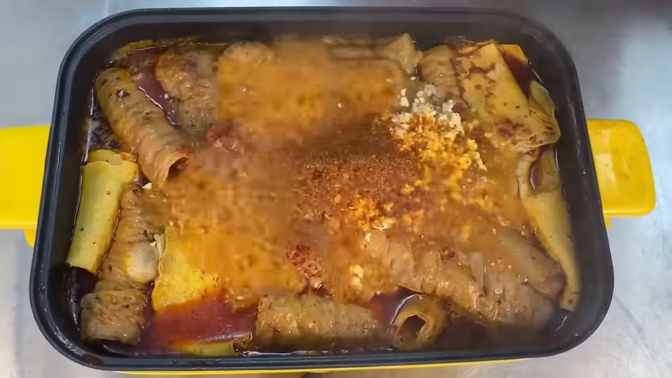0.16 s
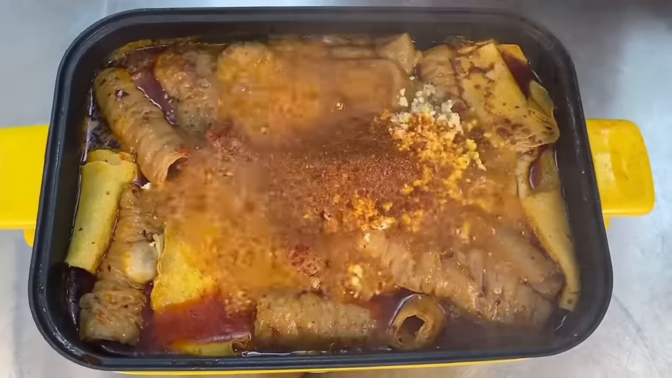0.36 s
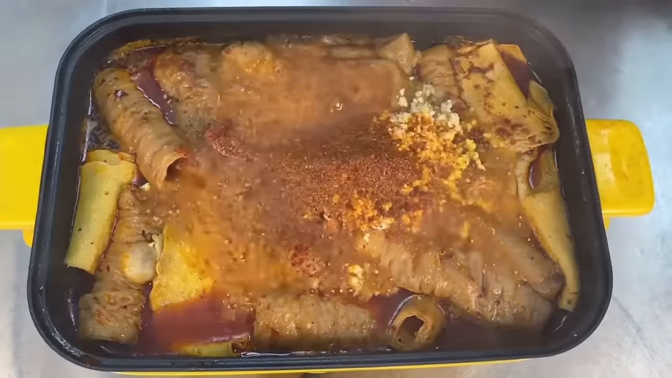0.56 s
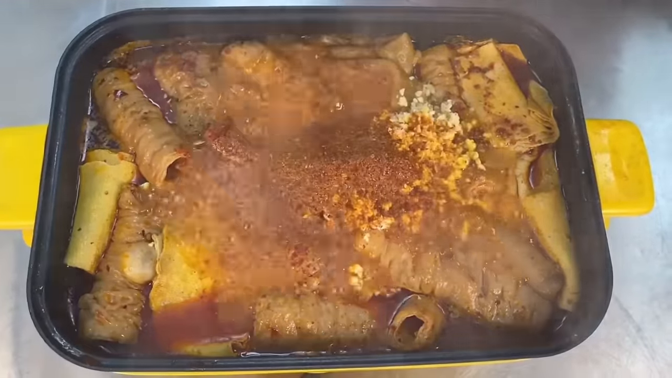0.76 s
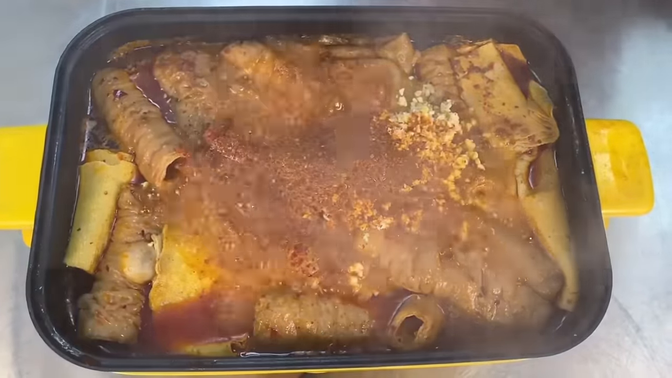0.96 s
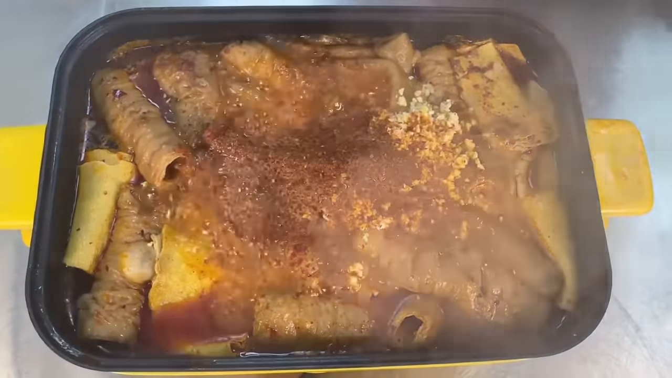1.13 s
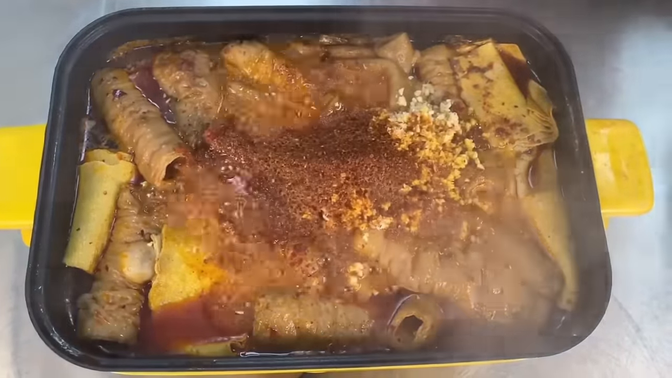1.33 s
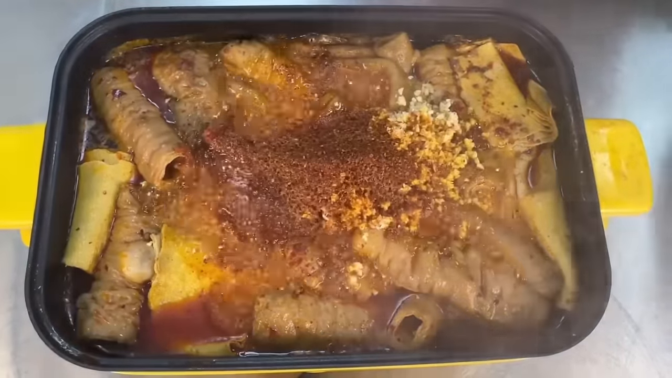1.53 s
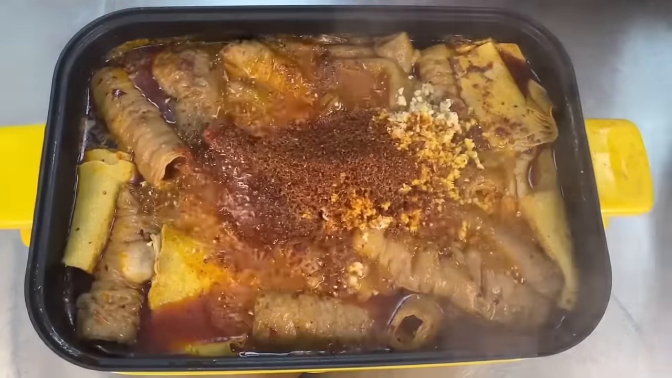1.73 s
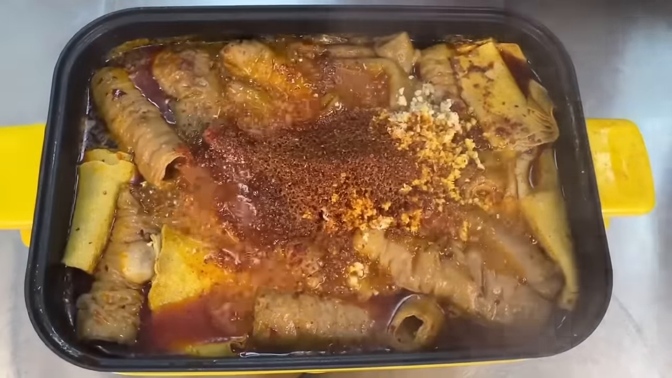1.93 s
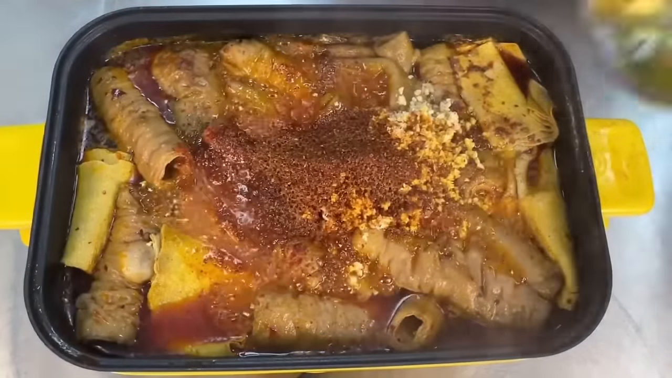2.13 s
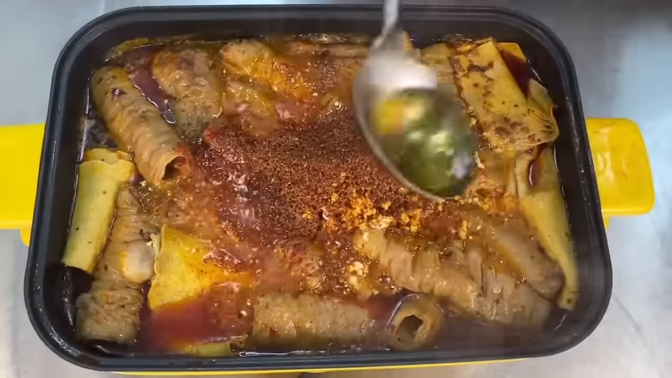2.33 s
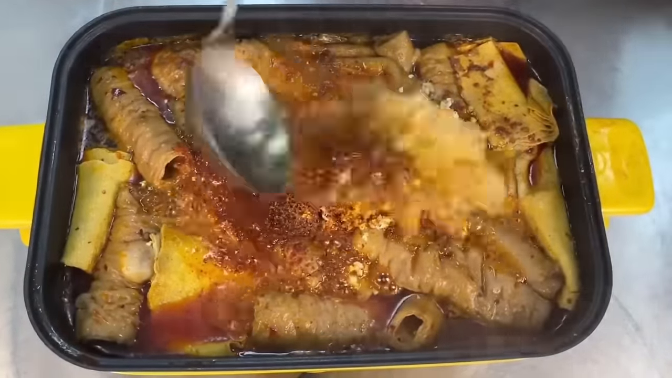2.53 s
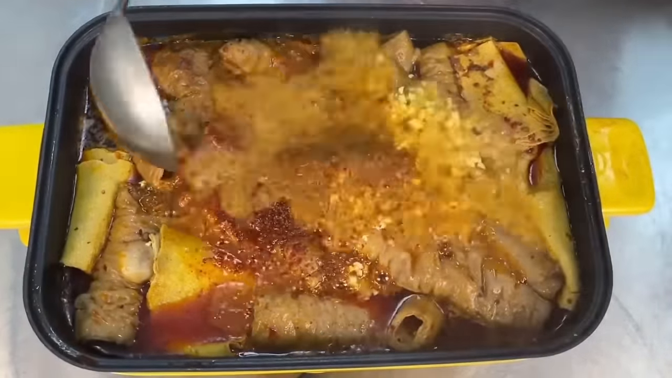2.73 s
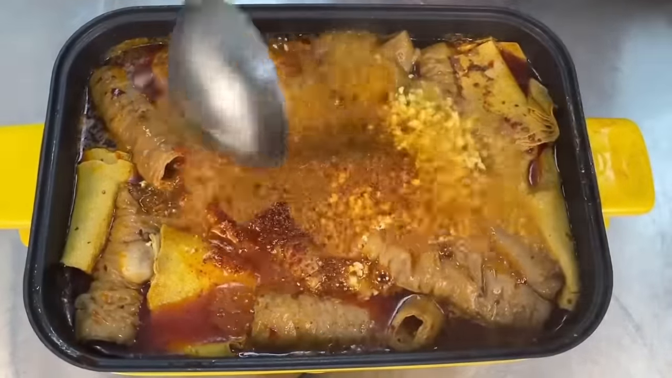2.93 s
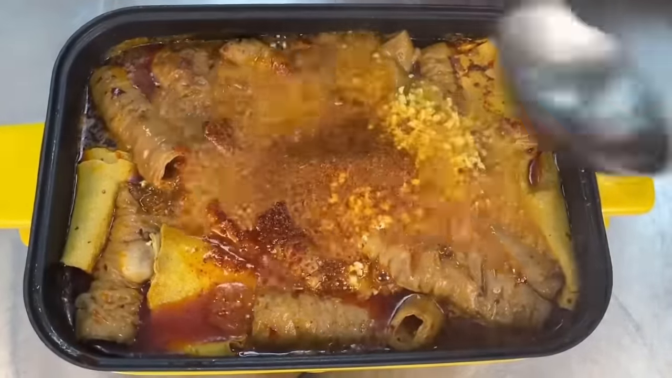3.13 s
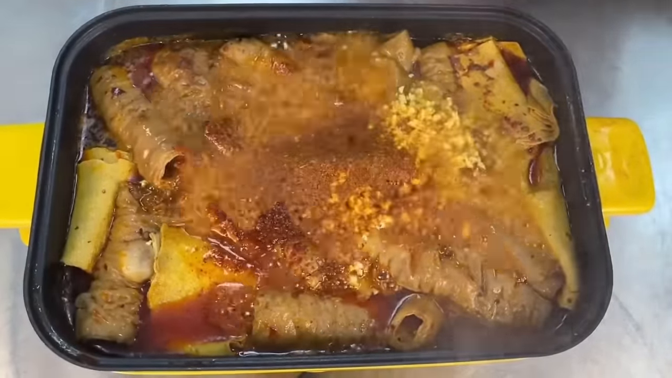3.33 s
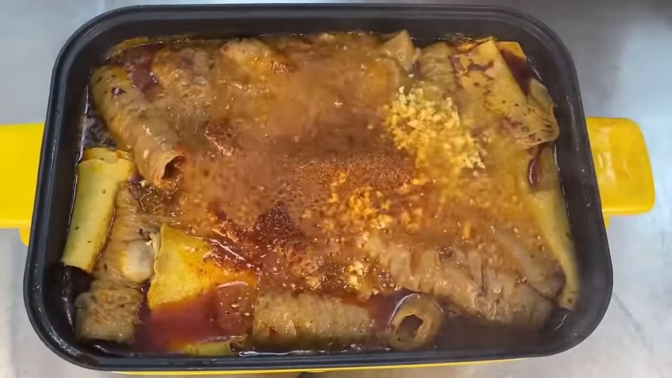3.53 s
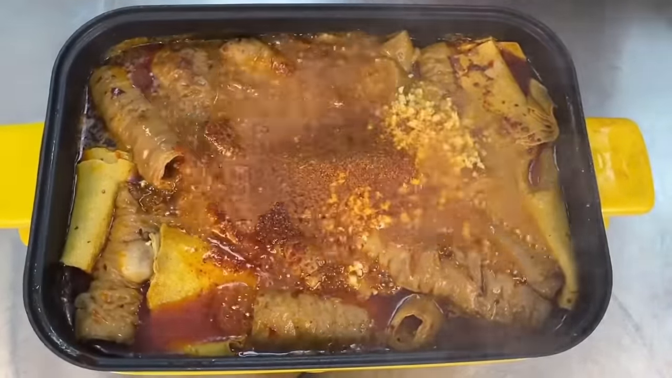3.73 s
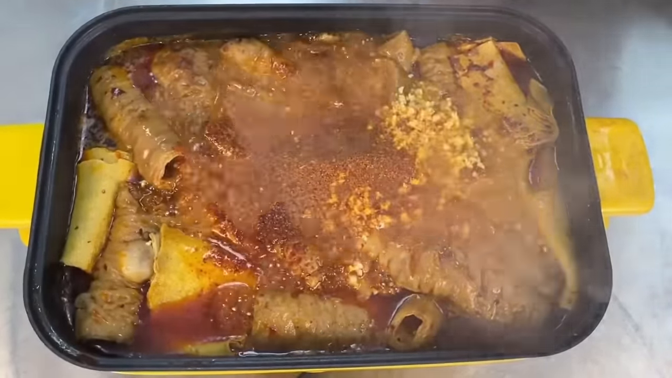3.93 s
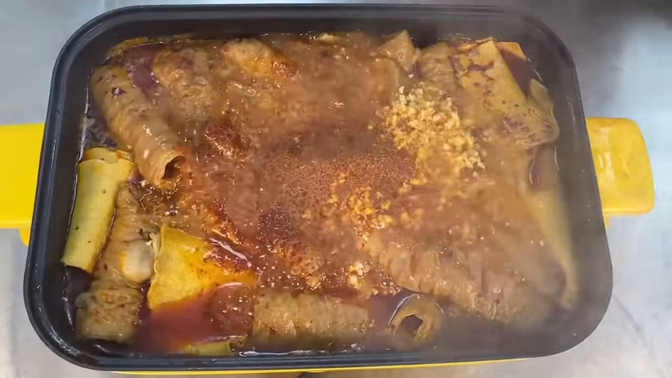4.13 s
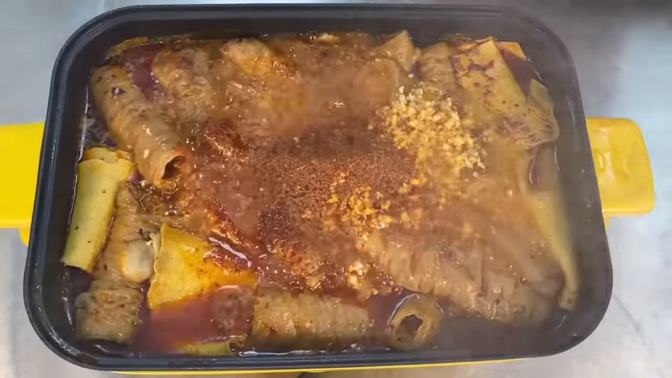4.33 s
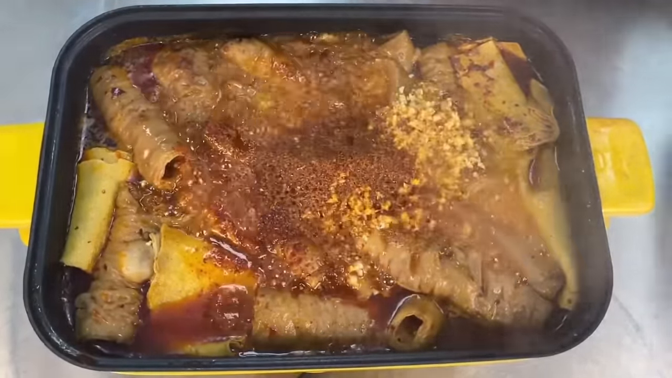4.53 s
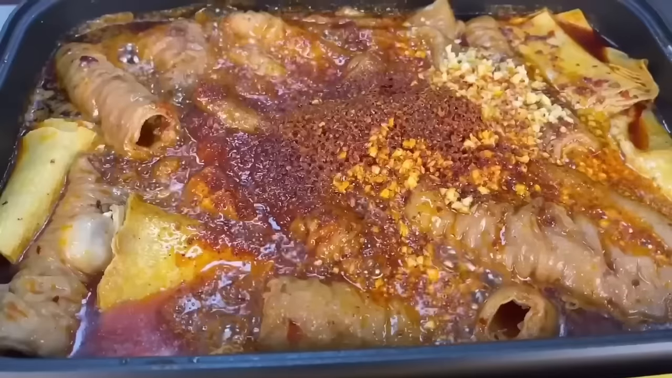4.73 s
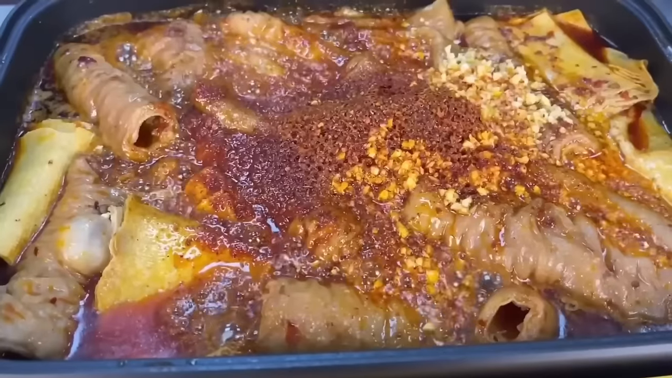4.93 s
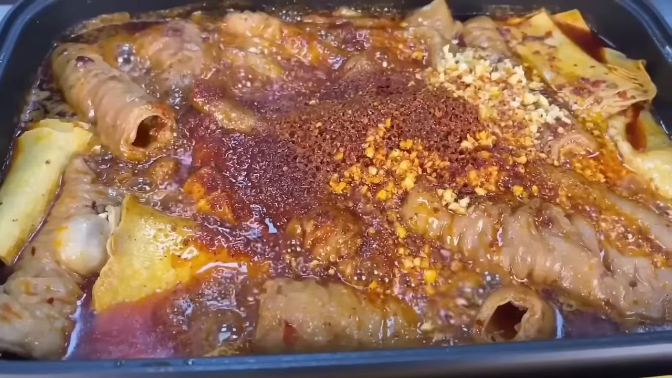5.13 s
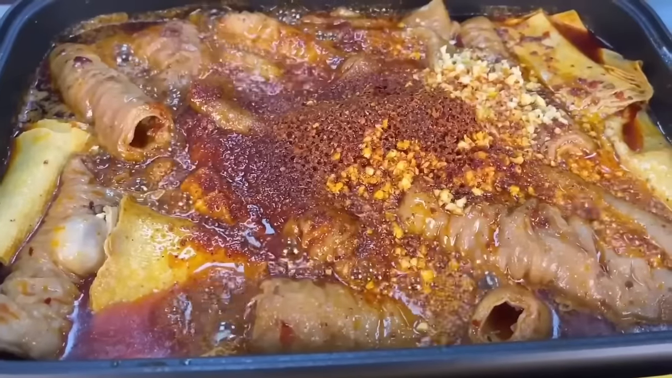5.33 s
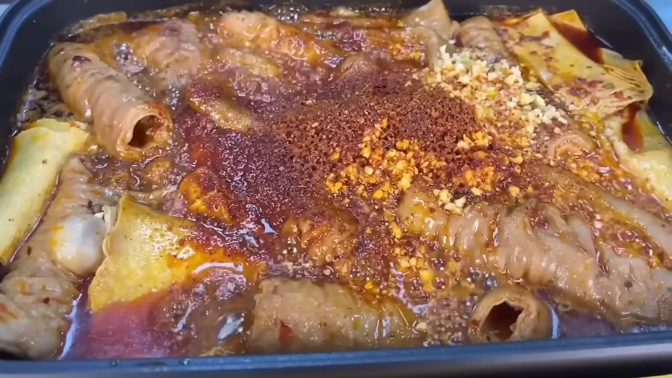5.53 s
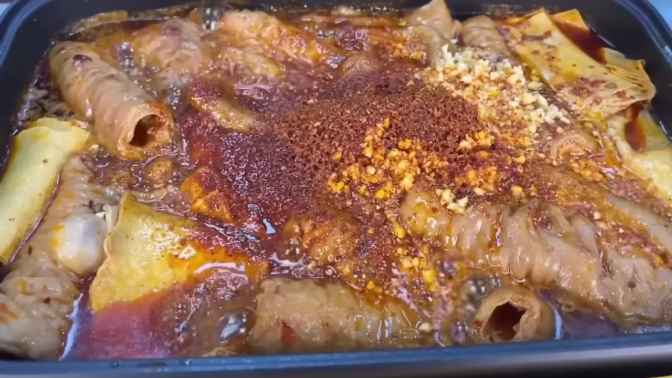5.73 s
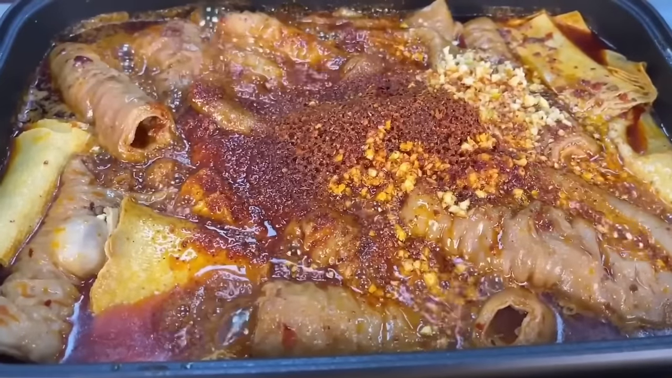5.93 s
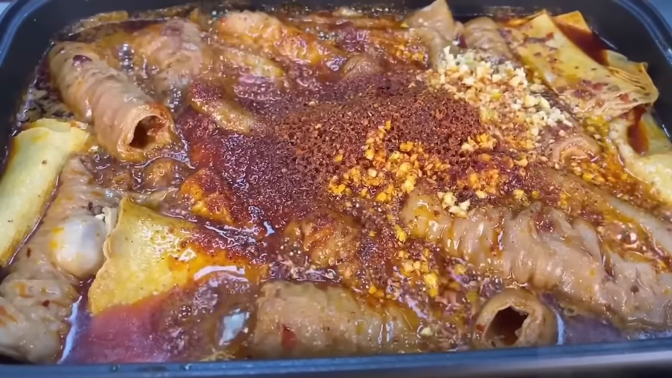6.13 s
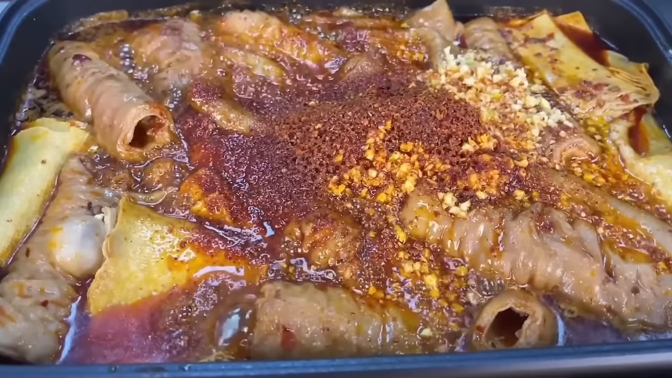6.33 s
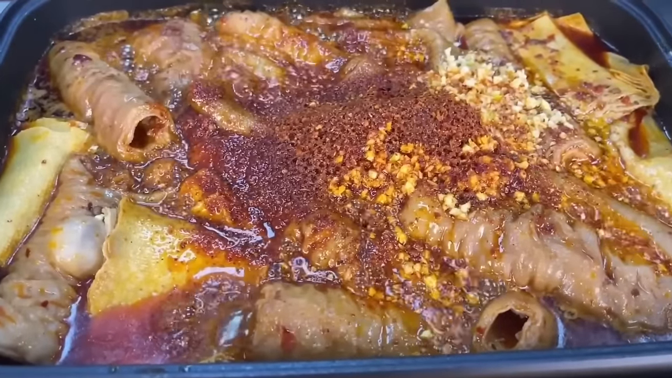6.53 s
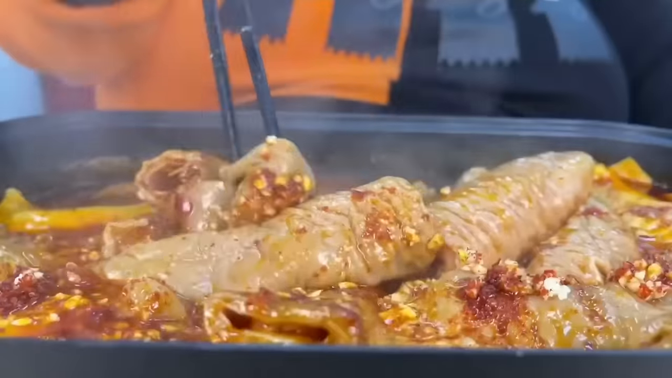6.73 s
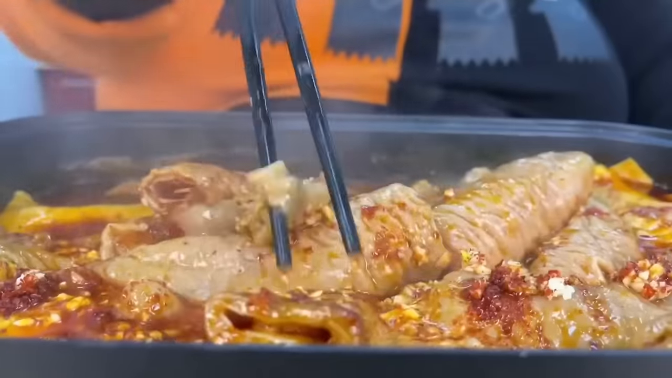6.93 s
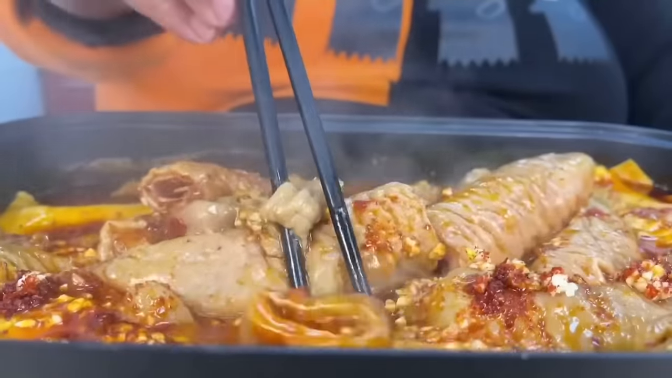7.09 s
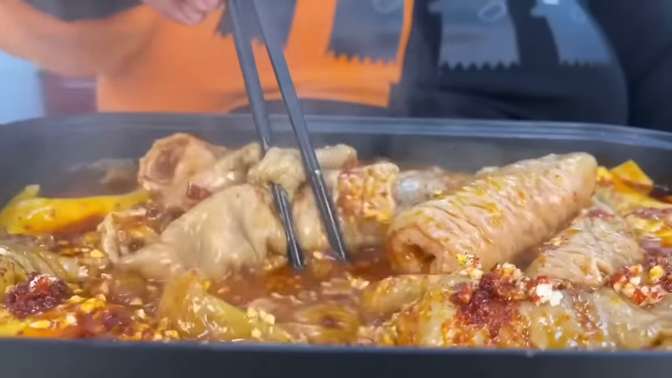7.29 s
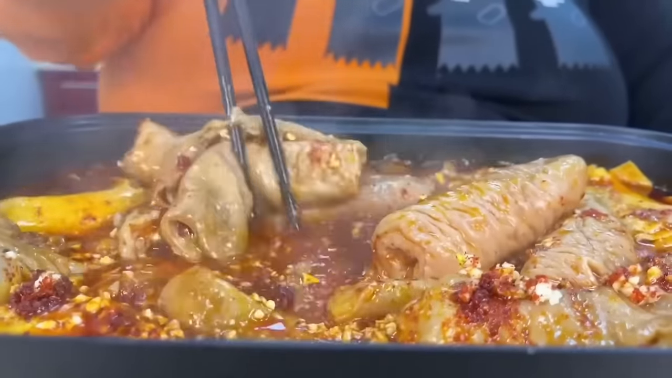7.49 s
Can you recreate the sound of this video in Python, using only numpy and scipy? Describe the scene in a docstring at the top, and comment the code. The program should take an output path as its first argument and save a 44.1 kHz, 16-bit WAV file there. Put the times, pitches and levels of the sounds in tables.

```python
"""An extractor fan hums in a kitchen while a ladle of hot oil sizzles and spits on spices in a tray,
close to two microphone ports. Further off, glass bottles start to rattle and clink in bursts.
At 2.4 s a second ladle lands, and more water flashes to steam in tiny bursting bubbles.
At 4.7 s the microphone moves: the fan is louder, the oil and bottles are quieter.
At 6.6 s the sound drops out for a moment, then returns with the kitchen alone."""
import sys
import numpy as np
from scipy import signal
from scipy.fft import rfft, irfft, next_fast_len
from scipy.io import wavfile
from scipy.ndimage import uniform_filter1d

SR = 44100
rng = np.random.default_rng(int(sys.argv[2]) if len(sys.argv) > 2 else 0)


def bounce(signal):
    """Save signal as a 16-bit WAV file at the path given by the first command-line argument."""
    frames = np.transpose(np.atleast_2d(signal))
    limited = np.clip(frames, -1, 1)
    pcm = np.round(limited * 32767).astype(np.int16)
    wavfile.write(sys.argv[1], SR, pcm)


N = 333332
T, FFT_SIZE = np.arange(N) / SR, next_fast_len(N)
HZ = np.fft.rfftfreq(FFT_SIZE, 1 / SR)

# Levels are relative within each table. A decay is the time to fade by 60 dB.
# Tone colour of each noise: f/Hz, level/dB
AIR_COLOUR = [(15, -54), (32, -20), (48, -6.5), (75, -9), (111, -3.5), (166, -8.5), (317, -10), (377, -11),
              (858, -18), (924, -20), (1130, -18.5), (1600, -25), (2050, -25), (9600, -40.5), (10100, -46),
              (12500, -63)]
CRATE_COLOUR = [(250, -2.5), (500, -5.5), (1000, 1), (1600, -2), (2500, -11.5)]
GLASS_COLOUR = [(710, -54), (1400, -16), (1750, -9), (2180, -5.5), (2460, -6.5), (2660, -0.5), (2730, -6),
                (3560, 3.5), (4960, -3), (10400, -6.5), (11500, -1.5), (15000, -67)]
FROTH_COLOUR = [(250, -38), (500, -5), (900, 2), (1500, -6.5), (2500, -7), (4000, -34)]
FIZZ_COLOUR = [(710, -62), (1200, -21.5), (1500, -8), (1770, -6), (2280, -3.5), (3460, -4), (3730, -0.5),
               (4650, -7), (5050, -3.5), (5550, 1), (8340, -2.5), (11500, -3.5), (15000, -14)]
# Tones of the fan's hum: f/Hz, width/Hz, level/dB
FAN_TONES = [(56.5, 24, -13), (109.4, 12.4, -6.5), (199.7, 20, -10.5), (870, 8.2, -17.5)]
# Worktop thuds, dull glass knocks and clear bottle rings: t/s, level/dB, f/Hz, decay/s
THUDS = [(0.194, -28.5, 230, 0.064), (0.395, -28.5, 227, 0.027), (0.73, -32, 472, 0.22),
         (0.752, -28, 357, 0.18), (3.716, -30, 359, 0.32), (6.327, -25.5, 191.6, 0.19),
         (6.528, -30.5, 160, 0.15)]
KNOCKS = [(0.7776, -15.5, 3785, 0.17), (1.053, -13, 3590, 0.08), (1.163, -13, 2290, 0.12),
          (1.178, -15.5, 1754, .14), (1.245, -16, 3700, .16), (1.305, -21, 1100, 0.13),
          (1.4102, -12.5, 2690, 0.056), (1.5628, -16, 2460, 0.046), (1.6813, -13, 2780, 0.09),
          (1.8425, -16.5, 3700, 0.13), (2.0157, -19.5, 3700, 0.055), (2.0718, -14, 3700, 0.14),
          (2.1172, -12, 3710, 0.13), (2.168, -27, 2020, 0.015), (2.3551, -16.5, 3990, 0.068),
          (2.6299, -20, 1970, 0.035), (2.8698, -19, 2450, .05), (3.7794, -14.5, 3650, 0.12),
          (3.9455, -14.5, 3355, 0.11), (4.008, -17, 3900, .1), (4.035, -20, 1710, .03),
          (4.125, -13.5, 4300, .12), (4.2762, -13, 2590, 0.043), (4.442, -16.5, 1510, 0.0069),
          (5.07, -27, 1840, 0.12), (5.082, -23, 3320, 0.118), (5.4084, -27, 4020, 0.05),
          (5.767, -26, 3930, 0.307)]
RINGS = [(0.788, -20, 3525, 0.089), (1.0, -30, 2800, 0.36), (1.02, -34, 2122, 0.93),
         (1.05, -30, 2601, 0.95), (1.152, -17, 2595, 0.13), (1.196, -21.5, 2142, 0.17),
         (1.228, -30, 1740, 0.59), (1.417, -17.5, 2446, 0.18), (1.419, -29, 2525, .9),
         (1.543, -20, 2830, 0.052), (1.562, -12.5, 2453, 0.065), (1.563, -18.5, 2400, 0.26),
         (1.565, -28, 2455, .45), (1.568, -23.5, 2007, 0.25), (1.685, -34.5, 3110, 0.53),
         (1.7, -27, 2006, 0.18), (1.773, -24.5, 2792, 0.25), (1.78, -33.5, 2450, 0.62),
         (1.844, -31, 3470, 0.15), (2.069, -36.5, 2430, 0.55), (2.015, -31, 3450, 0.18),
         (2.07, -24, 3475, 0.081), (2.116, -18, 3480, 0.067), (2.162, -27, 3090, 0.5),
         (2.164, -32, 2420, 0.45), (2.353, -19, 3486, 0.058), (2.355, -35.5, 3720, 0.44),
         (2.456, -25.5, 2796, 0.13), (2.457, -30, 3064, 0.98), (2.51, -33, 2365, 0.2),
         (2.629, -10.5, 2100, 0.019), (2.723, -31.5, 2365, 0.23), (2.868, -19, 2387, 0.038),
         (2.875, -29, 2407, 0.29), (2.931, -26, 2477, 0.2), (3.72, -26, 3510, 0.086),
         (3.733, -35.5, 2504, .9), (3.949, -27, 2624, 0.38), (4.033, -26, 1643, 0.082),
         (4.09, -34.5, 1731, 0.42), (4.04, -29, 2150, 0.45), (4.097, -29, 2170, 0.17),
         (4.107, -25, 2601, 0.35), (4.159, -32.5, 3235, 0.79), (4.273, -18, 2894, 0.11),
         (4.277, -18, 2550, 0.51), (4.277, -15, 2620, 0.1), (4.48, -31.5, 3437, 0.15),
         (4.555, -17, 2550, 0.014), (4.636, -25.5, 3126, 0.064), (4.91, -29, 2850, 0.088),
         (4.919, -38.5, 1625, 0.18), (4.923, -38, 2950, 0.34), (5.076, -39, 1610, 0.14),
         (5.077, -36, 1995, 0.24), (5.14, -42.5, 1612, 0.31), (5.19, -44, 2540, 0.29),
         (5.506, -40, 2020, 0.2), (5.784, -47, 1620, .2)]
# The crate drags, the bottles shake, the sizzle flares up: t/s (at full level), hold/s, level/dB
DRAGS = [(1.05, 0.17, -41), (1.2, 0.2, -39.5), (2.5, 0.34, -50.5), (4.05, 0.29, -40.5),
         (5.48, 0.034, -37.5)]
SHAKES = [(.74, 0.0077, -31.5), (.93, .06, -40), (1.03, 0.11, -25.5), (1.16, 0.061, -23.5),
          (1.24, 0.096, -25), (1.36, 0.13, -28), (1.56, 0.0051, -27), (1.74, 0.081, -35),
          (2.07, 0.059, -33), (2.14, 0.0052, -32), (2.37, 0.013, -35), (2.45, 0.012, -32),
          (2.74, 0.0076, -33.5), (3.74, 0.048, -31), (3.96, 0.0052, -27), (4.04, 0.015, -25.5),
          (4.11, 0.068, -26), (4.25, 0.054, -25.5), (4.35, .02, -30), (4.42, 0.06, -30.5),
          (4.49, 0.017, -33.5), (4.6, 0.023, -27.5), (4.88, 0.09, -40), (5.09, 0.082, -38.5),
          (5.52, 0.0092, -38), (5.78, 0.077, -46.5), (6.065, 0.011, -49.5), (6.25, 0.021, -45)]
FLARES = [(0, 0.023, -28.5), (.95, 0.25, -32), (2.5, 0.022, -32.5), (2.75, 0.043, -29), (4.0, 0.23, -34.5),
          (4.35, 0.37, -36), (4.67, 0.022, -40), (5.6, .05, -46), (6.59, 0.036, -49)]
# Single spits of oil: t/s, level/dB, f/Hz
SPITS = [(0.359, -15, 10100), (0.3688, -10.5, 10200), (0.748, -15, 6100), (1.0154, -11.5, 9250),
         (1.1898, -8.5, 9100), (1.205, -6.5, 9500), (1.3028, -3, 9900), (1.6576, -13, 10100),
         (2.0524, -17, 10000), (2.098, -18, 9500), (2.159, -12, 10350), (2.246, -13, 5650),
         (2.3463, -18.5, 9600), (2.9456, -16, 5570), (3.101, -21, 8000), (3.319, -15, 6900),
         (3.528, -17, 7040), (3.7953, -13, 10000), (3.89, -12, 10000), (4.36, -16, 10000),
         (4.487, -10, 10300), (4.6232, -16, 9100), (4.6322, -6.5, 10400), (4.882, -29, 10500),
         (5.0445, -23, 7000), (5.095, -29, 8600), (5.12, -27, 7000), (5.1716, -19, 10800),
         (5.178, -27, 8500), (5.365, -23, 7150), (5.3236, -23.5, 9800), (5.418, -16, 8200),
         (5.6043, -22, 10000), (6.018, -34, 10500), (6.3083, -22.5, 6700), (6.625, -28, 5560)]
# How alike left and right are, for near and for far sound: f/Hz, likeness/(0 to 1)
NEAR_LIKENESS = [(100, 0.84), (400, 0.23), (1500, 1), (4000, 0.31), (8000, 0.75), (12000, 0.88)]
FAR_LIKENESS = [(30, 0.98), (100, .98), (300, 0.93), (700, 0.034), (2000, 0.17), (5000, 0.12),
                (12000, 0.066)]
# How far the tray's sound is ahead at the left port: f/Hz, phase/rad
TRAY_LEAD = [(1000, -2), (3000, 0.7), (6000, -1.75), (10000, -2), (13000, -3.5)]
# Loss of treble, gentle for the spits and steep for all the rest: f/Hz, level/dB
SPIT_TREBLE = [(11500, -0.5), (13000, -18)]
REST_TREBLE = [(11500, 0), (11900, -8), (12200, -28), (13500, -40)]

POUR_S, POUR_SPREAD_S = 2.44, 0.06  # the second ladle lands and spreads over the spices
MOVE_S = 4.665  # the microphone moves
GAP_S, BACK_S = 6.631, 6.677  # the sound drops out and comes back


def amp(db):
    """Turns decibels into a number to multiply by."""
    return 10 ** (np.asarray(db) / 20)


def unit_power(x):
    """Scales a sound so that its average power is 1."""
    return x / np.sqrt(np.mean(x ** 2) + 1e-20)


def curve(points, hz=HZ):
    """Joins the points of a table to give its value at any frequency."""
    f, value = np.transpose(points)
    return np.interp(np.log(hz + 1), np.log(f + 1), value)


def to_sound(spectrum):
    """Turns a spectrum back into N samples."""
    return irfft(spectrum, FFT_SIZE)[..., :N]


def add(mix, start_s, sound):
    """Adds a sound into the mix at the given time."""
    part = mix[..., round(start_s * SR):][..., :sound.shape[-1]]
    part += sound[..., :part.shape[-1]]


def stereo(pair, colour, likeness, lead_rad=0):
    """Colours two unrelated noises and mixes them into a partly alike left and right."""
    shared, separate = rfft(pair, FFT_SIZE) * amp(curve(colour))
    alike = np.clip(curve(likeness), 0, 1)
    left = shared * np.exp(1j * lead_rad)
    right = alike * shared + np.sqrt(1 - alike ** 2) * separate
    return unit_power(to_sound([left, right]))


def grains(low_hz, high_hz, cycles, per_s, spread_db, pitches=16):
    """Two streams of tiny fading tones at random times and of uneven size."""
    spectrum = 0
    for hz in np.geomspace(low_hz, high_hz, pitches):
        turns = np.arange(int(3 * cycles * SR / hz)) * hz / SR
        grain = turns * np.exp(-3 * turns / cycles) * np.sin(2 * np.pi * turns)
        count = int(per_s * N / SR / pitches)
        starts = rng.integers(0, N, (2, 3000))[:, :count]
        sizes = amp(spread_db * np.minimum(rng.exponential(1, (2, 3000)), 5))[:, :count]
        clicks = np.zeros((2, FFT_SIZE), np.float32)
        np.put_along_axis(clicks, starts, sizes, 1)
        spectrum += np.sqrt(hz) * rfft(clicks) * rfft(grain / np.linalg.norm(grain), FFT_SIZE)
    return unit_power(to_sound(spectrum))


def flutter(span_s, depth_db):
    """Random swings in level, each about span_s long."""
    slow = uniform_filter1d(rng.standard_normal(N // 64 + 2), max(round(span_s * SR / 64), 1))
    return amp(depth_db * np.interp(np.arange(N) / 64, np.arange(len(slow)), unit_power(slow)))


def swell(rows, rise_db_per_s, fall_db_per_s):
    """Each row rises, holds and dies away; none reaches across the microphone's move."""
    t, power = T[::32], 0
    for full_s, hold_s, db in rows:
        rise_db = rise_db_per_s * np.maximum(full_s - t, 0)
        fall_db = fall_db_per_s * np.maximum(t - full_s - hold_s, 0)
        same_side = (t > MOVE_S) == (full_s > MOVE_S)
        power += amp(db - rise_db - fall_db) ** 2 * same_side
    return np.interp(T, t, np.sqrt(abs(uniform_filter1d(power, size=9))))


def ping(hz, decay_s, rise_s, shape=1):
    """One fading tone of a struck thing; a shape over 1 holds it up at first, then chokes it."""
    t = np.arange(int(decay_s * SR) + 50) / SR
    level = amp(-60 * (t / decay_s) ** shape) * (1 - np.exp(-t / rise_s))
    return level * np.exp(2j * np.pi * hz * t)


def room_echoes(sound, decay_s):
    """The kitchen sends back scattered echoes, different at each port."""
    t = np.arange(int(0.6 * SR)) / SR
    signs = rng.choice([-1., 1.], (2, len(t)))
    arrives = (rng.random((2, len(t))) < 0.05) * (t > 0.004)
    echoes = signs * arrives * amp(-60 * t / decay_s)
    return signal.fftconvolve(sound, echoes / np.linalg.norm(echoes[0]), axes=1)[:, :N]


def kitchen_fan():
    """Air rushes under the fan's wavering hum; both are louder once the microphone is nearer."""
    air = stereo(rng.standard_normal((2, N)), AIR_COLOUR, FAR_LIKENESS) * flutter(0.091, 0.58)
    noise = rfft(rng.standard_normal(FFT_SIZE))
    hum = 0
    for hz, width_hz, db in FAN_TONES:
        narrow_band = noise / (1 + (2 * (HZ - hz) / width_hz) ** 2)
        hum += amp(db) * unit_power(to_sound(narrow_band))
    nearer = T > MOVE_S
    level_db = -48 + 4 * nearer - 0.55 * (T > BACK_S)
    return (air + hum * amp(np.where(nearer, 0, -1.5))) * amp(level_db)


def worktop_thuds():
    """Soft bumps on the worktop, each a few low tones close together."""
    out = np.zeros(N)
    for start_s, db, hz, decay_s in THUDS:
        pitches = hz * (1 + 0.198 * np.append(0, rng.uniform(-0.82, 1, 8)))
        thud = sum(ping(f, decay_s, rise_s=0.068 * decay_s) for f in pitches)
        add(out, start_s, amp(db) * thud.imag / 4.5)
    return out


def from_crate(pair, colour, left_early_s=0.000322):
    """Sound from the crate reaches the left port first; only its bass is alike in both."""
    return stereo(pair, colour, [(300, 1.0), (700, 0.16)], 2 * np.pi * HZ * left_early_s)


def crate_scrape():
    """The bottles' crate drags, and many tiny catches blur into a scrape."""
    catches = grains(309, 2300, cycles=4.2, per_s=4000, spread_db=0.5)
    return from_crate(catches, CRATE_COLOUR) * swell(DRAGS, rise_db_per_s=268, fall_db_per_s=219)


def bottle_rattle(ring_width_hz=4.8, large_below_hz=3300):
    """Shaken bottles tap each other, which sets the larger ones ringing at their own pitches."""
    chinks = grains(1496, 5187, cycles=60, per_s=2000, spread_db=3, pitches=48)
    taps = grains(1320, 10480, cycles=5.7, per_s=6000, spread_db=0.5)
    rattle = from_crate(0.63 * taps + 0.57 * chinks, GLASS_COLOUR)
    rattle *= swell(SHAKES, rise_db_per_s=347, fall_db_per_s=150)
    resonances = sum((-1) ** k / (1 + 2j * (HZ - hz) / ring_width_hz)
                     for k, (_, _, hz, _) in enumerate(RINGS) if hz < large_below_hz)
    ringing = to_sound(rfft(rattle, FFT_SIZE) * resonances)
    return rattle + amp(7) * ringing * (T < MOVE_S)


def bottle_knocks():
    """Held glass knocks dully: a cluster of short tones, wider in pitch the shorter the knock."""
    out = np.zeros((2, N))
    for start_s, db, hz, decay_s in KNOCKS:
        spread = min(0.0528 + 0.00688 / decay_s, 0.6)
        knock = 0
        for detune, skew in rng.uniform(-0.987, 1, (24, 2)):
            tone = ping(hz * (1 + spread * detune), decay_s, rise_s=0.0017)
            knock += np.outer([1, np.exp(1.2j * skew)], tone)  # out of step at the two ports
        add(out, start_s, amp(db - 2) * knock.imag / abs(knock).max())
    return out


def bottle_rings():
    """A struck bottle rings clearly, and wavers as its neighbours keep touching it."""
    out = np.zeros((2, N))
    placings = rng.uniform(-1, 1, (len(RINGS), 2))
    jostle = flutter(0.015, 2.2)
    for (start_s, db, hz, decay_s), (pan, skew) in zip(RINGS, placings):
        sides = amp([1.4 * pan, -1.5 * pan]) * [1, np.exp(0.7j * skew)]
        ring = ping(hz, min(decay_s, 0.9), rise_s=0.00018, shape=1.316)
        ease_in = np.minimum(np.arange(len(ring)) / 900, 1)
        touches = np.resize(jostle[round(start_s * SR):], len(ring)) ** ease_in
        add(out, start_s, amp(db) * np.outer(sides, ring * touches).imag)
    return out


def bottle_clinks():
    """Knocks and rings echo round the kitchen; the echoes are shorter after the move."""
    hits = bottle_knocks() + bottle_rings()
    before_move = T < MOVE_S
    echoes = room_echoes(hits * before_move, decay_s=0.57) * before_move
    echoes += room_echoes(hits * ~before_move, decay_s=0.34)
    return 0.84 * hits + amp(-6.5) * echoes


def second_ladle():
    """Rises from 0 to 1 as the second ladle of oil spreads."""
    return np.clip((T - POUR_S) / POUR_SPREAD_S, 0, 1)


def oil_froth(first_fade_db_per_s=8.5, second_fade_db_per_s=6):
    """Larger bubbles froth as each ladle lands, then die away; the first froth fades faster."""
    bubbles = grains(340, 2970, cycles=5.4, per_s=2500, spread_db=2)
    first = amp(-first_fade_db_per_s * T)
    second = second_ladle() * amp(-second_fade_db_per_s * (T - POUR_S))
    sides = amp([[4], [-4]])  # louder on the left
    return amp(-43.5) * stereo(bubbles, FROTH_COLOUR, FAR_LIKENESS) * (first + second) * sides


def oil_sizzle():
    """Water flashes to steam in the hot oil: tiny bubbles burst and crackle over a hiss."""
    hiss = rng.standard_normal((2, N))
    bursts = grains(1210, 14000, cycles=2.1, per_s=3000, spread_db=-1)
    crackle = grains(3000, 11500, cycles=3, per_s=120, spread_db=3, pitches=8) * flutter(0.09, 4)
    blend = 0.75 * hiss + 0.6 * bursts + 0.13 * crackle
    fizz = stereo(blend, FIZZ_COLOUR, NEAR_LIKENESS, curve(TRAY_LEAD)) * flutter(0.07, 1.15)
    rates = dict(rise_db_per_s=20, fall_db_per_s=8.5)
    first = swell([row for row in FLARES if row[0] < POUR_S], **rates)
    second = swell([row for row in FLARES if row[0] > POUR_S], **rates)
    return fizz * np.hypot(first, second_ladle() * second)


def oil_spits(spray_decay_s=0.05):
    """Each spit is a snap about a millisecond long with a faint spray of after-snaps."""
    out = np.zeros((2, N))
    t = np.arange(80) / SR
    from_peak_s = t - 0.0007
    spray_fade = amp(-60 * np.arange(700) / SR / spray_decay_s)
    for start_s, db, hz in SPITS:
        pip = np.exp(-(from_peak_s / 0.0002) ** 2 + 2j * np.pi * hz * t)
        tick = np.exp(-(from_peak_s / 0.00007) ** 2 + 2j * np.pi * 0.7 * hz * t)
        snap = pip + 0.35 * tick
        spray = rng.standard_normal(len(spray_fade)) * spray_fade
        spit = 0.23 * signal.convolve(spray, snap) / np.linalg.norm(snap)
        add(spit, 0, snap)
        sides = [np.exp(1j * curve(TRAY_LEAD, hz)), 1]
        add(out, start_s - 0.0005, amp(db) * np.outer(sides, spit).real)
    return out


def scene():
    """Mixes all the sources; the spits keep more of their treble than the rest."""
    oil = (oil_sizzle() + oil_froth()) * (T < BACK_S)
    bottles = bottle_rattle() + crate_scrape() + bottle_clinks()
    rest = oil + bottles + worktop_thuds() + kitchen_fan()
    rest_spectrum = rfft(rest, FFT_SIZE) * amp(curve(REST_TREBLE))
    spit_spectrum = rfft(oil_spits(), FFT_SIZE) * amp(curve(SPIT_TREBLE))
    return to_sound(rest_spectrum + spit_spectrum)


def record(dry):
    """The sound fades out fast and snaps back; the very highest treble is cut throughout."""
    fade_db_per_s, top_hz = 1508, 16000
    gap_db = -fade_db_per_s * np.maximum(T - GAP_S, 0) * (T < BACK_S)
    low_pass = signal.firwin(511, top_hz, window=("kaiser", 9), fs=SR)
    return signal.oaconvolve(dry * amp(gap_db), low_pass[None], "same")


dry = scene()
out = record(dry)
bounce(out)
```